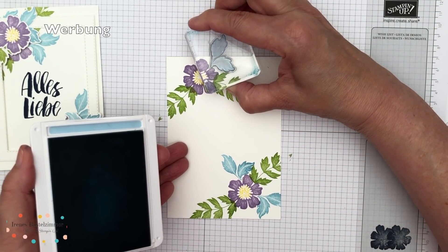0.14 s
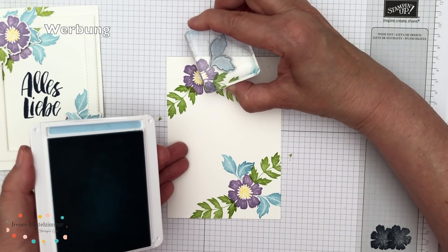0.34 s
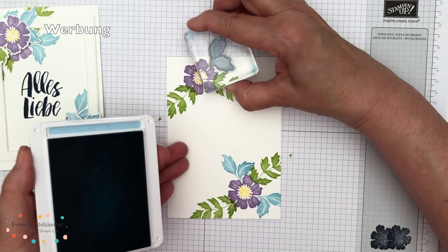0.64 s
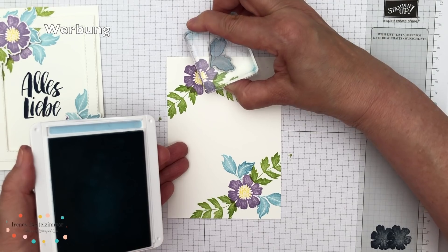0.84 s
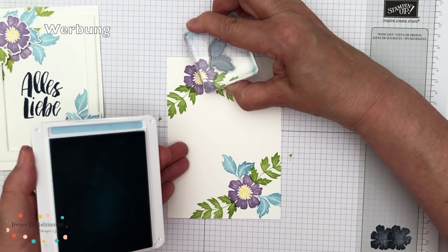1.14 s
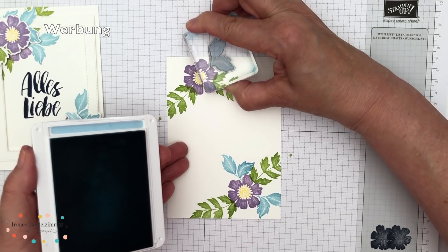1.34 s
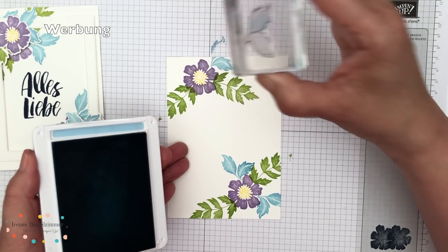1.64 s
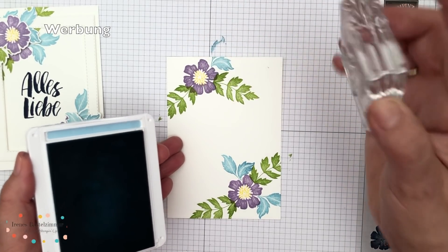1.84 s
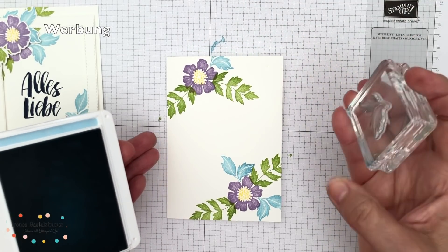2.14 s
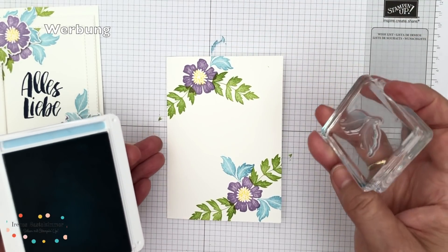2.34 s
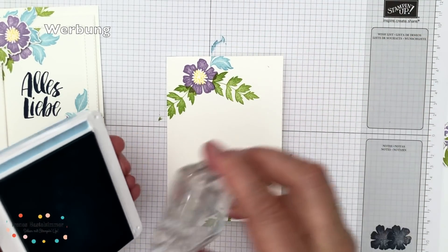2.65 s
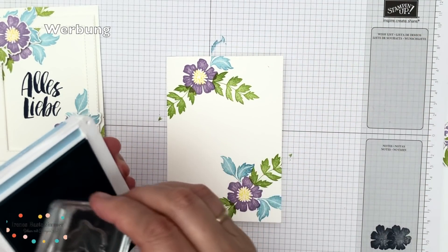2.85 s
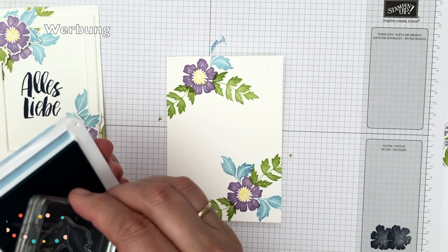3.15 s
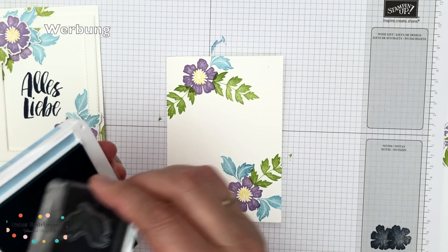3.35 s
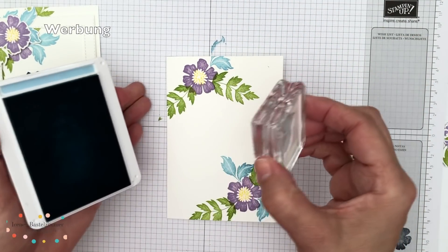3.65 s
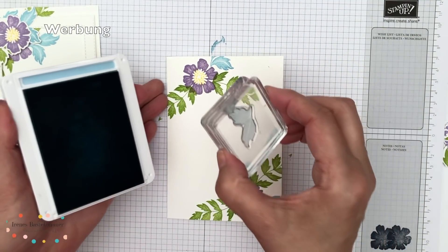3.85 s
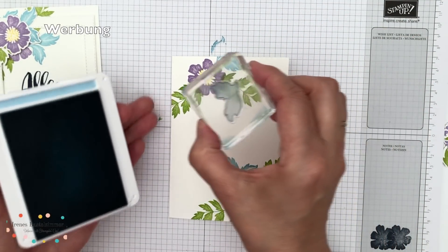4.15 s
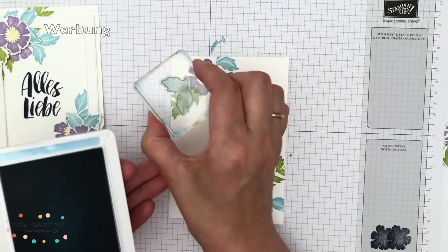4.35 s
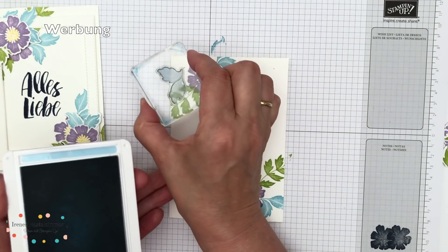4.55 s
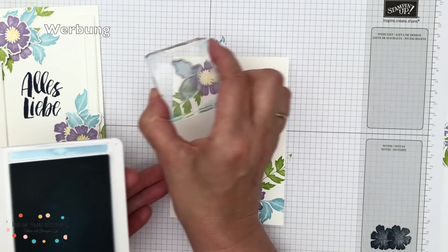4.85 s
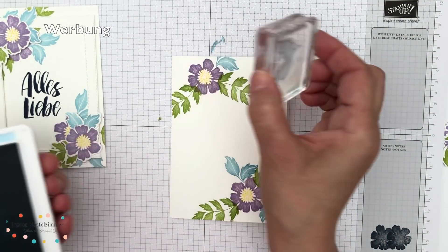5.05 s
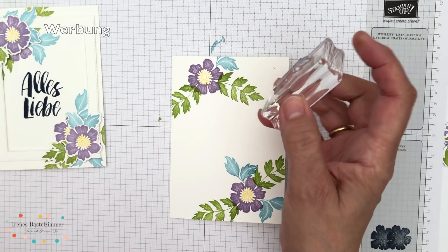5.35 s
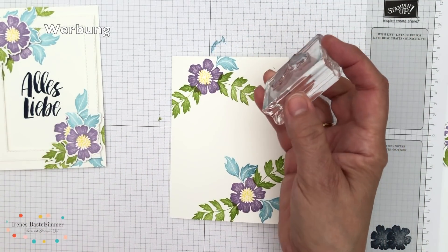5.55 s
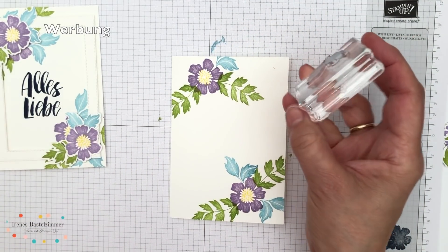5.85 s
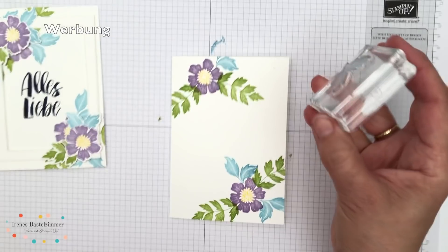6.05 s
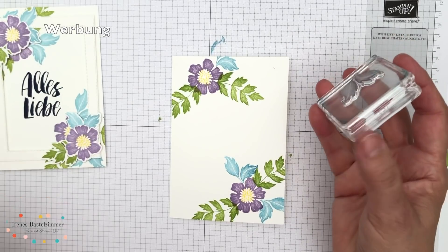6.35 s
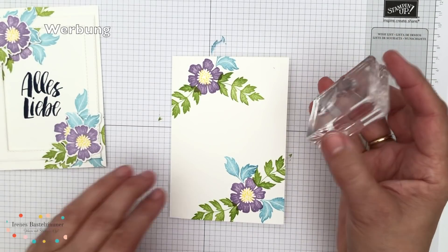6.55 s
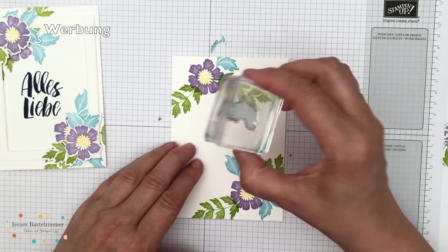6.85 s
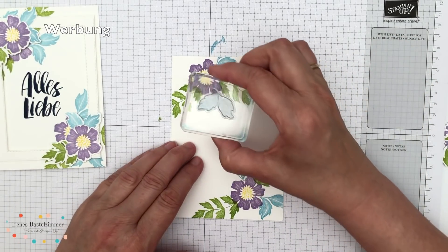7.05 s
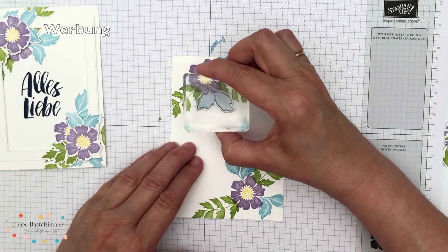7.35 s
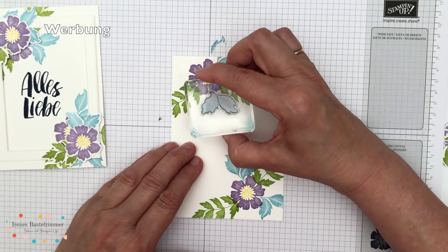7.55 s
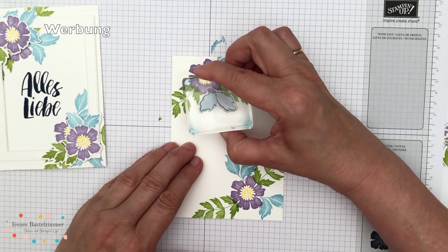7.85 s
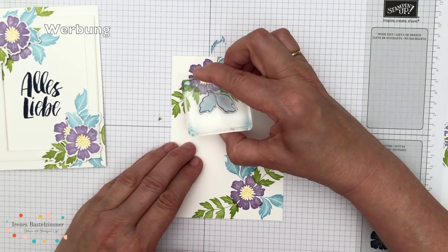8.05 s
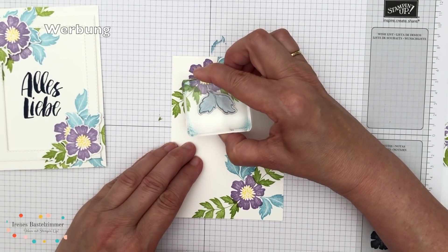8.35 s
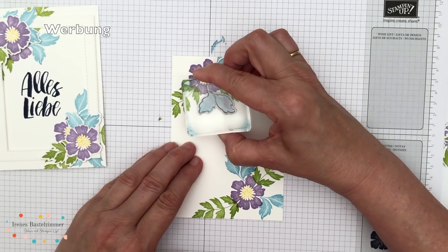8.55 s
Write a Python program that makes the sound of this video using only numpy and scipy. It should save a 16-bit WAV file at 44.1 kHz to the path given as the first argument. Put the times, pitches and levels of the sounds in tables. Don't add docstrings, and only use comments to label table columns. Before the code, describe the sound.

Near-silence with faint soft taps, then a bright click as a clear block peels from card. Light skin rubbing, muffled ink-pad taps, and a crisp fingernail tick follow. A hollow hard-plastic case lands with a rattling bounce and closes with two very loud cracks that shake the table and ring in the small room. Gentle thuds and rubbing end it, close microphone, low rumble and hiss.

```python
import sys
import numpy as np
from scipy import signal
from scipy.fft import rfft, irfft
from scipy.io import wavfile
from scipy.ndimage import uniform_filter1d

SR = 44100
rng = np.random.default_rng(int(sys.argv[2]) if len(sys.argv) > 2 else 0)


def invert_db(x):
    u = np.asarray(x, float) / 20
    return 10 ** u


def inscribe(sig):
    pcm = np.round(np.clip(np.atleast_2d(sig).T, -1, 1) * 32767)
    wavfile.write(sys.argv[1], SR, pcm.astype(np.int16))


N = 383348
GRAIN = 4096
LEAD = 64
SILENT_DB = -140


def colour(x, points):
    hz, db = np.transpose(points)
    f = np.maximum(np.fft.rfftfreq(len(x), 1 / SR), 1)
    gain = invert_db(np.interp(np.log(f), np.log(hz), db, left=-80))
    return irfft(rfft(x) * gain, len(x))


def band_pass(x, low_hz, high_hz):
    return signal.sosfilt(signal.butter(2, [low_hz, high_hz], "bandpass", fs=SR, output="sos"), x)


def fade(t, t60):
    return np.exp(-np.log(1000) * t / t60)


def peak(x, db):
    return x * invert_db(db) / np.max(np.abs(x))


def same_energy(x, like):
    return x * np.sqrt(np.sum(like ** 2) / np.sum(x ** 2))


def walk(rate):
    k = int(SR / rate)
    held = np.repeat(rng.standard_normal(N // k + 1), k)
    return uniform_filter1d(uniform_filter1d(held, k), k)[:N]


def hush():
    # pitch_hz, level_db (per Hz)
    hush_colour = [(19, -35), (32, -10), (95, -3), (160, -2), (207, -4), (377, -5), (633, -9), (702, -11),
                   (779, -13), (1530, -17), (1650, -17.5), (2570, -20), (9660, -24), (15800, -30)]
    floor = colour(rng.standard_normal(N), hush_colour)
    low = signal.sosfilt(signal.butter(2, 900, fs=SR, output="sos"), floor)
    wander_db = 0.65 * walk(1.9) + 1.8 * walk(9.8)
    floor = floor + low * (invert_db(wander_db) - 1)
    return floor * invert_db(-64.5) / np.std(floor)


def room(x):
    # pitch_hz, t60_s
    room_t60 = [(60, 0.48), (300, 0.39), (600, .37), (1200, .43), (2500, 0.45), (5000, .34), (10000, 0.21),
                (16000, .18)]
    # pitch_hz, level_db
    room_colour = [(60, 1), (250, 2), (600, -2.1), (1200, 2), (2500, -3.5), (5000, -4.5), (10000, -4),
                   (16000, -7)]
    known_hz, known_t60 = np.transpose(room_t60)
    t, tail = np.arange(int(.8 * SR)) / SR, 0
    for hz in 50 * 2 ** np.arange(0, 8.6, .5):
        band = band_pass(rng.standard_normal(len(t)), hz / 2 ** .25, hz * 2 ** .25)
        tail = tail + band * fade(t, np.interp(np.log(hz), np.log(known_hz), known_t60))
    build_up = np.clip((t - .003) / 0.0014, 0, 1)
    tail = colour(tail * build_up, [(20, -2.5)] + list(room_colour))
    return signal.fftconvolve(x, tail / np.sqrt(np.sum(tail ** 2)))[:N]


def table_ring(knocks):
    # pitch_hz, level_db, t60_s
    table_modes = [(68, -13.5, .35), (126, 4.5, .4), (249.6, -7, 0.36), (267, -2, 0.4), (317.5, -3.5, 0.5),
                   (375.5, -10.5, 0.36), (470, -12, 0.11), (622, -3.5, 0.079)]
    t = np.arange(SR // 2) / SR
    modes = sum(invert_db(db) * hz / SR * fade(t, t60) * np.sin(2 * np.pi * hz * t) for hz, db, t60 in table_modes)
    return signal.fftconvolve(knocks, modes)[:N]


def disperse(x):
    lag_s, lag_power = .003, .55
    f = np.fft.rfftfreq(N, 1 / SR)
    lag = lag_s * ((1000 / np.maximum(f, 60)) ** lag_power - (1 / 16) ** lag_power)
    phase = 2 * np.pi * np.cumsum(lag) * SR / N
    return irfft(rfft(x) * np.exp(-1j * phase), N)


def ring(t, hz, cycles, rough, noise):
    near = band_pass(noise, hz / 1.4, hz * 1.54)
    swell = 1 - np.exp(-2 * hz * t)
    return fade(t, cycles / hz) * swell * (np.sin(2 * np.pi * hz * t) + rough * near / np.std(near))


def hits(events, crack, crack_t60, shell_cycles, table_cycles, rough, spread):
    out, t = np.zeros((3, N + GRAIN)), np.arange(GRAIN) / SR
    click = np.roll(signal.unit_impulse(GRAIN), LEAD)
    for s, crack_db, shell_db, table_db, shell_hz, table_hz, tilt_db in events:
        noise, i = rng.standard_normal((3, GRAIN)), int(s * SR)
        tint = [(hz, db + tilt_db * np.log2(hz / 3000)) for hz, db in crack]
        burst = noise[0] * fade(t, crack_t60) * np.minimum(t / 0.00075, 1)
        bright = peak(colour(np.roll(burst, LEAD), tint), crack_db)
        shell = peak(ring(t, shell_hz, shell_cycles, rough, noise[1]), shell_db)
        knock = peak(ring(t, table_hz, table_cycles, rough, noise[2]), table_db)
        out[0, i - LEAD:i - LEAD + GRAIN] += bright
        out[:2, i:i + GRAIN] += shell, knock
        walls = same_energy(colour(click, tint), bright)
        walls = walls + same_energy(ring(t, shell_hz, spread * shell_cycles, 0, noise[1]), shell)
        walls = walls + same_energy(ring(t, table_hz, spread * table_cycles, 0, noise[2]), knock)
        out[2, i:i + GRAIN] += walls
    return out[:, :N]


def rubbing():
    # start_s, length_s, level_db, brightness_db
    strokes = [(1.733, .08, -78.5, 10.5), (1.796, 0.036, -74.5, -9), (1.892, 0.11, -73.5, 2),
               (1.955, 0.083, -79, -10), (2.2, .2, -84, -10), (2.45, 0.42, -82.5, -13.5),
               (2.631, 0.056, -82, 18), (3.496, .08, -79, 10), (3.71, .12, -73.5, 1),
               (3.93, 0.125, -73.5, -4.5), (4.08, .3, -88, -7), (4.702, 0.12, -70, -0.5),
               (4.803, 0.11, -73, -6), (4.895, 0.13, -73.5, -6), (5.11, .14, -70.5, 1.5),
               (5.21, 0.23, -69, -3), (5.487, .12, -70, 0), (6.611, .05, -76, 0.2), (6.68, .04, -79, -6),
               (6.739, .08, -70.5, 5), (6.987, .04, -77.5, 4.8), (7.18, .2, -70.5, -1),
               (7.395, .22, -66, 1.7)]
    # share of brightness, level_db, low_hz, high_hz
    layers = ((1, -2, 7500, 18000), (0, 0, 3670, 9620), (-0.75, -1, 840, 3340), (-1.1, -2.5, 88, 520))
    stroke_shape = np.array([0, .13, 1 - .55, 1])
    t, out = np.arange(N) / SR, 0
    slips = invert_db(2.106 * walk(60) + 1.6 * rng.exponential(size=N))
    for lean, layer_db, low_hz, high_hz in layers:
        hiss = band_pass(slips * rng.standard_normal(N), low_hz, high_hz)
        gain = 0
        for s, length, db, bright_db in strokes:
            speed = np.interp(t, s + length * stroke_shape, [0, 1, 1, 0])
            gain = gain + invert_db(db + layer_db + lean * bright_db) * speed
        out = out + hiss / np.std(hiss) * gain
    return out


def peeling():
    # end_s, length_s, level_db, centre_hz
    peels = [
        (3.074, 0.028, -64.5, 1800),
        (3.163, .012, -68.5, 2200),
        (3.27, 0.022, -66, 1800),
        (3.424, .026, -67.5, 2000),
        (3.729, 0.027, -64.5, 4000),
        (5.217, 0.012, -60, 6160),
        (5.731, 0.047, -45, 1300),
        (5.808, 0.013, -43, 2500),
        (6.012, 0.037, -48, 798),
        (6.035, 0.027, -39.5, 1100),
    ]
    out = np.zeros(N)
    for end, length, db, hz in peels:
        chance, size = rng.random((2, GRAIN)), min(int(length * SR), GRAIN)
        snaps = (chance[0] < .06) * np.log(chance[1] + 1e-9) * (-1) ** np.arange(GRAIN)
        snaps[:size] *= np.linspace(.3, 1, size)
        snaps[size:] = 0
        grain = band_pass(snaps, hz / 2.3, hz * 1.8)
        out[int(end * SR) - size:][:GRAIN] += grain * invert_db(db) / np.std(grain[:size])
    return out


def pad_dabs():
    # start_s, level_db, pitch_hz
    thuds = [(.853, -49.5, 380), (.872, -48, 320), (.918, -49.5, 370), (0.9494, -45.5, 370),
             (1.1455, -45, 440), (2.966, -51, 93), (2.968, -43.5, 335), (3.158, -47, 314),
             (3.158, -56, 78.5), (3.265, -55, 610), (3.314, -52, 397), (3.328, -64, 110), (3.71, -51, 220),
             (4.7285, -44.5, 447), (4.921, -47, 323), (6.8742, -36, 446), (6.879, -40, 456),
             (6.892, -53, 470), (6.907, -56, 452)]
    # start_s, level_db, pitch_hz, crack_db (re tap)
    taps = [(1.0342, -56, 1500, -5), (1.1479, -58, 706, -8), (2.968, -41, 1230, -12.5),
            (3.0722, -37.5, 1620, -22), (3.158, -44, 850, -18), (3.265, -44.5, 915, -7),
            (3.314, -47.5, 960, -11), (3.409, -45, 1040, -4.5), (3.42, -47, 835, -13),
            (3.417, -50, 2100, -18), (3.411, -48, 2600, -20), (4.7278, -60, 1580, 7), (4.92, -55, 802, -2),
            (6.8742, -49.5, 1110, -5.5)]
    # pitch_hz, level_db (per Hz)
    pad_crack = [(2000, -10), (4000, -7.5), (8000, -13), (16000, -20.5)]
    soft = [(s, SILENT_DB, SILENT_DB, db, hz, hz, 0) for s, db, hz in thuds]
    soft += [(s, db + crack, db, SILENT_DB, hz, hz, -4) for s, db, hz, crack in taps]
    dabs = hits(soft, pad_crack, crack_t60=0.016, shell_cycles=4.6, table_cycles=8.0, rough=0.23, spread=0.66)
    # start_s, crack_db, ring_db, knock_db, ring_hz, knock_hz, tilt_db
    hollow = (3.7049, -43.5, -47, -47.5, 1480, 478, 2.5)
    dabs += hits([hollow], pad_crack, crack_t60=0.039, shell_cycles=110.0, table_cycles=110.0,
                 rough=0.69, spread=0.99)
    return dabs


def ticks(rows, knock_db, knock_hz):
    return [(s, db, db + ring_db, db + knock_db, hz, knock_hz, tilt) for s, db, ring_db, hz, tilt in rows]


def stamp_block():
    # start_s, crack_db, ring_db (re crack), ring_hz, tilt_db (per octave)
    edge_ticks = [
        (1.594, -43, -25, 1700, 2),
        (1.5975, -33, -12, 1700, -2.5),
        (1.6009, -34, -3, 1230, 5),
        (1.6043, -15.5, -29, 1170, -2.86),
        (1.6056, -32, -6, 1100, 0.5),
        (1.614, -36, -5, 1690, 4),
        (6.846, -47, 4.5, 2110, -1),
        (6.868, -56, 9, 2242, 3),
        (6.949, -59, 12, 9500, 3),
    ]
    # start_s, crack_db, ring_db (re crack), ring_hz, tilt_db (per octave)
    nail_ticks = [
        (1.5382, -42.5, -3.5, 1330, -4.5),
        (1.801, -53.5, -1, 880, -9),
        (1.9794, -61, 12, 2900, -2),
        (2.0849, -43.5, -16, 1100, -9),
        (4.6677, -29.5, -9.5, 2250, -2),
        (4.6765, -44, -5, 1140, -5),
        (4.8594, -66, 2, 2390, 3),
        (5.2106, -36, -7, 1230, 12),
        (5.281, -44.5, -4, 920, 2),
    ]
    # pitch_hz, level_db (per Hz)
    block_crack = [(1500, -24), (2300, -20.5), (2900, -2), (3700, -4.5), (4800, -14), (5700, -3.5),
                   (6800, -4.5), (7500, -20.5), (9300, -14), (11200, -18), (13000, -14), (16000, -28)]
    nail_crack = [(1500, -42), (2500, -4.5), (5000, -0.9), (9000, -4.5), (12000, -13), (16000, -24)]
    block = hits(ticks(edge_ticks, -20, 442), block_crack, crack_t60=0.01186, shell_cycles=22.0,
                 table_cycles=24.0, rough=0.32, spread=0.16)
    block += hits(ticks(nail_ticks, -26, 435), nail_crack, crack_t60=0.0087, shell_cycles=19.5,
                  table_cycles=11.0, rough=1.0, spread=.4)
    return block


def ink_case():
    # start_s, blow_db, edge_crack_db (re blow), tilt_db (per octave), shell_hz
    case_blows = [(5.5551, -8.5, -6.5, 0, 800), (5.5788, -20, 0.5, -2, 919), (5.591, -27, -9, -4.5, 1099),
                  (5.692, -22, -14, -3, 580), (5.716, -31.5, -6, -7, 1087), (5.722, -26, -12.5, -6, 587.2),
                  (5.7925, -35.5, 13.5, 2.5, 1086), (5.797, -33, -2, -1.5, 1194),
                  (5.8, -21.5, -18, -5.5, 580), (5.926, -51.5, 9, -6, 1209), (5.974, -34, -17.5, -5.5, 800),
                  (6.0147, -41, 1, -.1, 847), (6.0265, -33.5, -2, -1, 896), (6.0377, -3.5, 8, -2.03, 747.5),
                  (6.0797, -9, 3.5, 0.6, 1203), (6.099, -18, -3, -5.5, 1233)]
    # start_s, level_db, knock_hz
    landings = [
        (5.974, -31, 400),
        (6.0374, -13, 249.9),
    ]
    # pitch_hz, level_db (per Hz)
    case_crack = [(1500, -17.5), (2400, -8), (3200, 1), (4500, -4), (6200, -5.5), (7600, -8),
                  (10000, -13.5), (13000, -17), (16000, -33)]
    blows = [(s, db + edge, db, -22.5 + .55 * db, hz, 220, tilt) for s, db, edge, tilt, hz in case_blows]
    blows += [(s, SILENT_DB, SILENT_DB, db, hz, hz, 0) for s, db, hz in landings]
    case = hits(blows, case_crack, crack_t60=.016, shell_cycles=16.0, table_cycles=2.9, rough=0.94, spread=0.25)
    lid_hz, lid_db = 1770, -2
    lid = [(s, SILENT_DB, db + lid_db, SILENT_DB, lid_hz, 260., 0) for s, db, *_ in case_blows]
    case += hits(lid, case_crack, crack_t60=.016, shell_cycles=15, table_cycles=6., rough=1.0, spread=0.75)
    return case


def scene():
    case, block, dabs = ink_case(), stamp_block(), pad_dabs()
    grit = peeling()
    air, knocks, _ = case + dabs
    through_table = air + knocks + block[1] + invert_db(-1.5) * table_ring(case[1])
    near = disperse(through_table) + block[0] + grit
    far = invert_db(-8.0) * case[2] + invert_db(-18.0) * block[2] + invert_db(-15.0) * dabs[2] + invert_db(-6.0) * grit
    no_bass = signal.butter(6, 60, "highpass", fs=SR, output="sos")
    table = signal.sosfilt(no_bass, near + room(disperse(far)))
    return (table + rubbing() + hush())[None]


def roll_off(x):
    return signal.sosfilt(signal.butter(12, 15970, fs=SR, output="sos"), x)


def record(dry):
    return roll_off(np.clip(dry, -1, 1))


dry = scene()
out = record(dry)
inscribe(out)
```